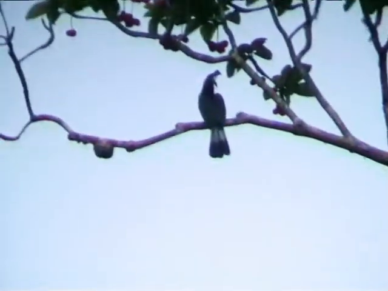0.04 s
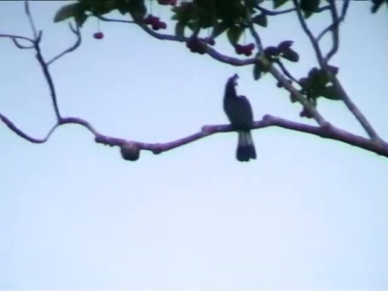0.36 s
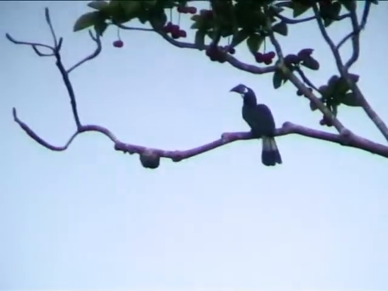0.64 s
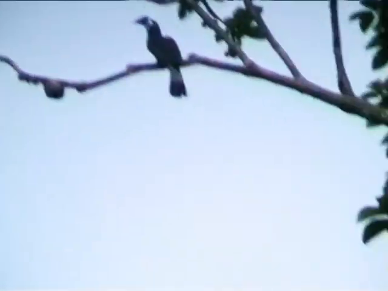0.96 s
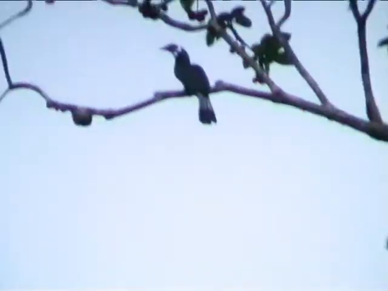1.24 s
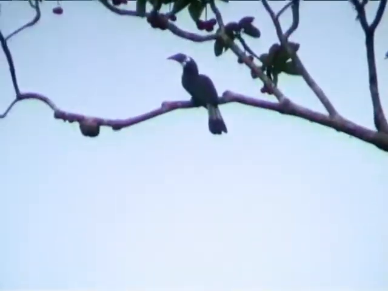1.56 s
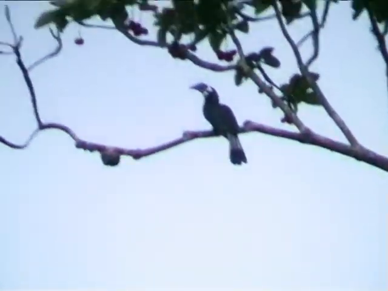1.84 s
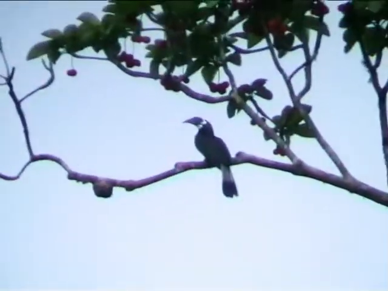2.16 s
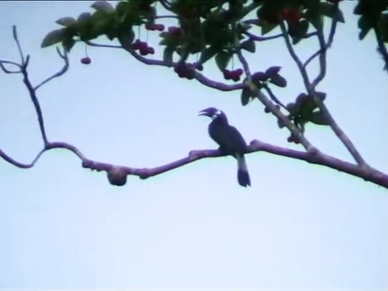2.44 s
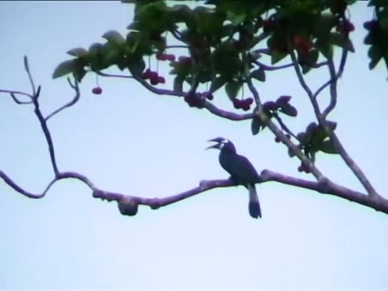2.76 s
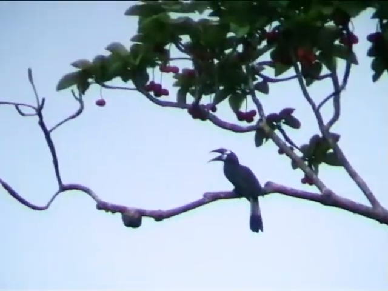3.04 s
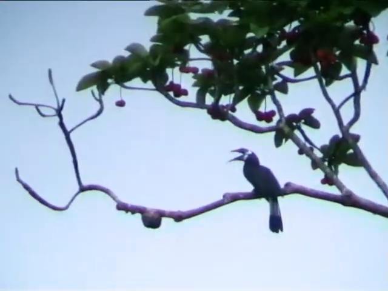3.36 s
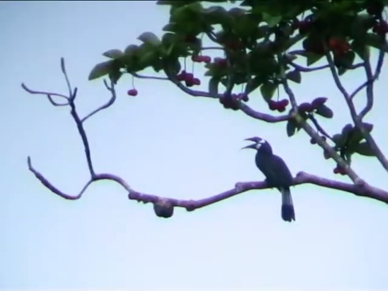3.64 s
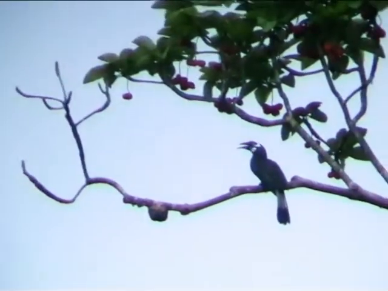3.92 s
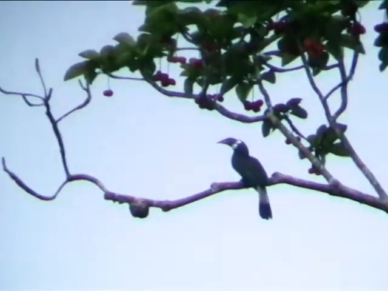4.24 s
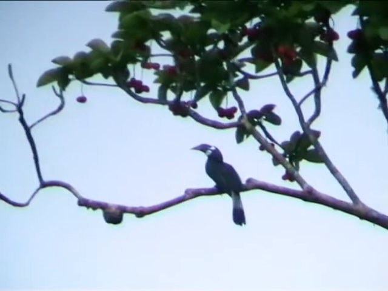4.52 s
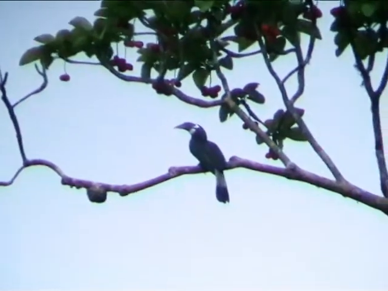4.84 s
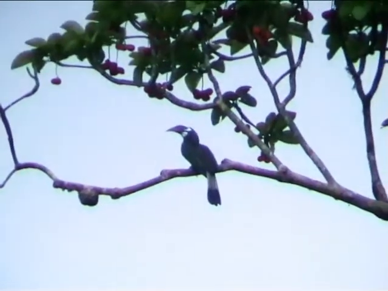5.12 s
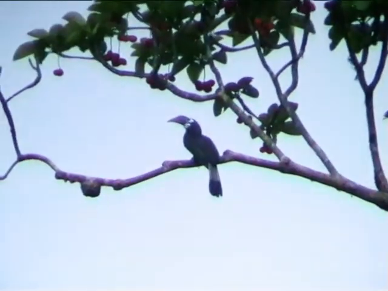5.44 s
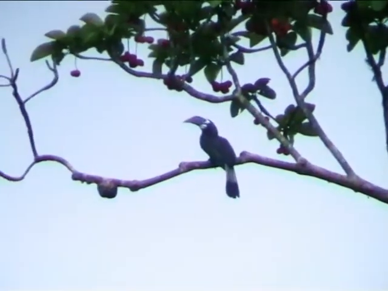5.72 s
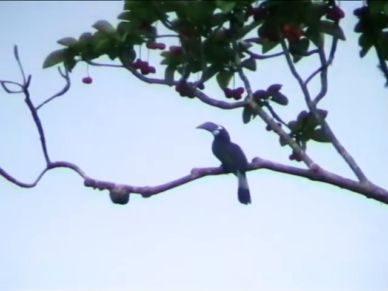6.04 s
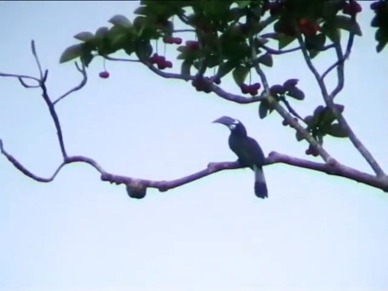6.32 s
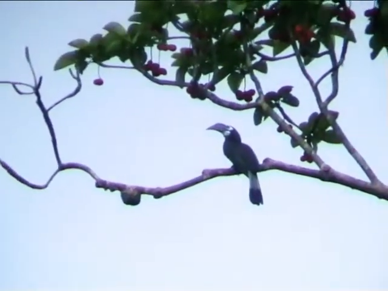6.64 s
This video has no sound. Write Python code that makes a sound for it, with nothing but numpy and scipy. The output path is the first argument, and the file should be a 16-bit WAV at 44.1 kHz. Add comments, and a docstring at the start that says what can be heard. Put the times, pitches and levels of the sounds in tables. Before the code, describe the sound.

In a forest, a hornbill calls from a treetop: a few short notes, then a run of four loud, piping yelps that rise and fall in pitch. Softer reedy yelps and pips follow, then a second run of four. The calls echo lightly among the trees. A small bird chips and trills thinly far off, over a steady rush like distant water, all heard in mono.

```python
"""In a forest, with hornbills calling from a treetop: two loud runs of arched, piping yelps, and softer,
reedy yelps and pips between and across them. Each is a nearly pure tone with a hoarse octave, echoed by
limbs, leaves and trunks. Far off, small birds chip and trill thinly over a steady rush like distant water.
The microphone is a mono camera's, with a row of narrow notches at multiples of its motor hum."""
import sys
import numpy as np
from scipy import signal
from scipy.fft import rfft, irfft
from scipy.io import wavfile
from scipy.ndimage import uniform_filter1d

SR = 44100
rng = np.random.default_rng(int(sys.argv[2]) if len(sys.argv) > 2 else 0)


def log_audio(samples):
    """Write samples as a 16-bit WAV file to the path given in sys.argv[1]."""
    # one column per channel
    frames = np.atleast_2d(samples).T
    # limit to full scale, then quantise
    limited = np.clip(frames, -1, 1)
    pcm = np.round(limited * 32767).astype(np.int16)
    wavfile.write(sys.argv[1], SR, pcm)


N = 298998

# spectrum of the distant rush, lower and upper part: (frequency [Hz], relative level [dB])
RUSH_LOW = [(20, -54), (42, -43), (62, -53), (95, -15.5), (150, -14), (250, -4), (370, 4.5), (520, 4.5),
            (650, 3), (980, 6.5), (1380, 2.5), (1650, 2)]
RUSH_HIGH = [(2000, -0.5), (2400, -3.5), (3100, -5), (3800, -7.5), (5000, -7.5), (6400, -8.5),
             (7500, -14.5), (9000, -22), (11000, -32), (13500, -44), (15700, -46)]
# its slow swell: (time [s], gain [dB])
RUSH_SWELL = [(0, -0.45), (1.5, -0.84), (3, 0.11), (6.8, 0.1)]

# falling chips of a small bird, far off: (middle time [s], level [dB])
CHIPS = [(.552, -24), (.797, -26), (.960, -28), (1.503, -25), (1.684, -23.5), (2.859, -21), (3.033, -22.5)]
CHIP_S, CHIP_HZ, CHIP_FALL_HZ = .045, 6320, 1030
# its buzzy, slightly rising trills: (middle time [s], pitch [Hz], level [dB])
TRILLS = [(.262, 6465, -25), (1.995, 6275, -27.5), (2.310, 6020, -29.5)]
TRILL_S, TRILL_RISE_HZ, TRILL_DEPTH_HZ, TRILL_RATE_HZ = .074, 313, 425, 105
# faint, even whistles from further off still: (middle time [s], pitch [Hz], level [dB])
WHISTLES = [(3.208, 4520, -29), (5.277, 4970, -26)]
WHISTLE_S = .051

# reflections off nearby limbs: (delay [s], gain [ratio])
LIMB_BOUNCES = [(.00318, .55), (.0080, .18)]
# hornbill voice colour, added to the note levels below; weak at the foot of the voice,
# thin where the highest yelps top out: (frequency [Hz], gain [dB])
VOICE_COLOUR = [(1320, -7), (1450, 0), (1600, 0.5), (1700, -3), (1820, 0), (1885, 0.3), (1925, -13.5),
                (1990, -2), (2800, 1.5), (3400, -1.5), (3730, -0.5), (3850, -8.5), (4000, -12)]
# short, pure pips: (time of top [s], top pitch [Hz], level [dB])
PIPS = [(1.033, 1320, -16.5), (3.898, 1680, -20), (4.229, 1645, -21.5), (4.432, 1675, -19),
        (4.610, 1570, -27), (4.797, 1260, -15.5)]
PIP_S, PIP_FALL_HZ, PIP_OCTAVE_DB = .066, 93, -38.5
# soft yelps: (time of top [s], length [s], top pitch [Hz], fall to either end [Hz], level [dB])
SOFT_YELPS = [ (0.053, .085, 1800, 240, -18), (0.23, .07, 1735, 91, -18), (.404, .064, 1715, 50, -8.5),
              (2.896, .07, 1720, 159, -19), (3.070, .085, 1863, 253, -15.5), (3.236, .08, 2000, 459, -9),
              (3.389, .075, 1645, 228, -22), (3.398, .072, 1858, 213, -18), (3.564, .075, 1856, 251, -19.5),
              (3.601, .062, 1580, 120, -28), (3.735, .08, 1847, 250, -27), (4.855, .055, 1676, 110, -20),
              (5.052, .065, 1853, 110, -23.5), ]
SOFT_USUAL_DB, SOFT_OCTAVE_DB, OCTAVE_DB_PER_DB = -19, -26.5, .28
# full yelps: (time of top [s], top pitch [Hz], arch half width [s], level [dB], octave level [dB])
FULL_YELPS = [ (1.260, 1706, 0.031, -13.5, -32), (1.461, 1927, 0.047, -11, -25.5),
              (1.6727, 1944, 0.049, -11.5, -27.5), (1.901, 1903, .0463, -11.5, -25),
              (5.020, 1710, 0.029, -12.5, -29), (5.225, 1890, .0445, -14, -27),
              (5.441, 1870, 0.047, -13.5, -24), (5.674, 1636, 0.034, -17, -30.5), ]
FOOT_HZ, YELP_S = 1364, .138
POINTED_HZ, POINTED_SHAPE, FLATTEN_PER_HZ = 1689, 1.93, .00833

# the camera's notches: (frequency [multiples of the motor hum])
NOTCH_ORDERS = [.5, 1, 2, 3, 4, 6, 7, 8, 9, 10, 11, 12, 13, 14, 16, 18, 20, 22, 24]


def amp(db):
    """Decibels to gain."""
    return 10 ** (np.asarray(db) / 20)


def unit(x):
    """Scales to rms 1."""
    return x / np.sqrt(np.mean(x ** 2) + 1e-20)


def level_at(spectrum, hz):
    """A spectrum's level in dB, interpolated on a log-frequency axis."""
    points_hz, db = np.transpose(spectrum)
    return np.interp(np.log(hz + 1), np.log(points_hz + 1), db)


def delayed(x, s):
    """The sound s seconds later."""
    return np.interp(np.arange(N) - s * SR, np.arange(N), x, left=0)


def waver(rate_hz):
    """Random wavering of rms 1, up to about the given rate."""
    hz = np.fft.rfftfreq(N, 1 / SR)
    return unit(irfft(rfft(rng.standard_normal(N)) * np.exp(-(hz / rate_hz) ** 2), N))


def note(middle, length, edge_s):
    """Sample indices, times from the middle, and the soft-edged envelope of one note."""
    start, end = int((middle - length / 2) * SR), int((middle + length / 2) * SR)
    at = np.arange(max(start, 0), min(end, N))
    t = at / SR - middle
    ramp = np.clip((length / 2 - abs(t)) / edge_s, 0, 1)
    return at, t, np.sin(np.pi / 2 * ramp) ** 2


def distant_rush(level_db=-19, patch_db=.61):
    """The bed of the scene: broad, far-off noise with faint drifting patches and a slow swell."""
    frames, hz = N // 256 + 5, np.fft.rfftfreq(2048, 1 / SR)
    real, imag, patches = rng.standard_normal((3, frames, len(hz)))
    patches = uniform_filter1d(patches, size=16, axis=0)  # smooth in time
    patches = unit(uniform_filter1d(patches, size=24, axis=1))  # and in frequency
    spectra = (real + 1j * imag) * amp(level_at(RUSH_LOW + RUSH_HIGH, hz) + patch_db * patches)
    noise = signal.istft(spectra.T, nperseg=2048, noverlap=1792)[1][:N]
    swell_db = np.interp(np.arange(N) / SR, *np.transpose(RUSH_SWELL))
    return unit(noise) * amp(level_db + swell_db)


def small_birds(scatter_hz=170):
    """Thin chips, trills and whistles far from the microphone; the more a note sweeps, the more ragged."""
    notes = [(s, CHIP_S, CHIP_HZ, -CHIP_FALL_HZ, 0, db) for s, db in CHIPS]
    notes += [(s, TRILL_S, hz, TRILL_RISE_HZ, TRILL_DEPTH_HZ, db) for s, hz, db in TRILLS]
    notes += [(s, WHISTLE_S, hz, 0, 0, db) for s, hz, db in WHISTLES]
    out, tremor = np.zeros(N), waver(450)
    for s, length, middle_hz, sweep_hz, depth_hz, db in notes:
        at, t, envelope = note(s, length, edge_s=.027)
        ragged = min((abs(sweep_hz) + depth_hz) / 900, 1)
        hz = middle_hz + sweep_hz * t / length + depth_hz * np.sin(2 * np.pi * TRILL_RATE_HZ * t)
        hz += ragged * scatter_hz * tremor[at]
        out[at] += amp(db) * envelope * np.sin(2 * np.pi * np.cumsum(hz) / SR)
    return out


def forest_scatter(x, t60_s, build_s, echoes_per_s=2000):
    """Trunks and leaves send back sparse random echoes that build up and die away."""
    t = np.arange(SR) / SR
    echoes = rng.standard_normal(SR) * (rng.random(SR) < echoes_per_s / SR)
    echoes *= (1 - np.exp(-t / build_s)) * np.exp(-np.log(1000) * t / t60_s)
    return signal.fftconvolve(x, echoes / np.linalg.norm(echoes))[:N]


def limb_bounces(x):
    """Reflections reach the microphone just behind the direct sound, so a glide swells and dips."""
    return x + sum(gain * delayed(x, lag_s) for lag_s, gain in LIMB_BOUNCES)


def arch_top(s, length, top_hz, fall_hz, db, octave_db, fade_db=10):
    """Only the top of a pitch arch is voiced; towards the ends the fundamental fades before the octave."""
    at, t, envelope = note(s, length, edge_s=.0096)
    away = (2 * t / length) ** 2
    return at, top_hz - fall_hz * away, envelope * amp(db - fade_db * away), envelope * amp(octave_db)


def soft_yelp(s, length, top_hz, fall_hz, db):
    """A soft yelp is reedy: its octave stays strong when the effort drops."""
    octave_db = SOFT_OCTAVE_DB + OCTAVE_DB_PER_DB * (db - SOFT_USUAL_DB)
    return arch_top(s, length, top_hz, fall_hz, db, octave_db)


def full_yelp(s, top_hz, half_width_s, db, octave_db):
    """The pitch leaps from the foot of the voice and falls back; the higher the leap, the flatter its top."""
    at, t, envelope = note(s, YELP_S, edge_s=.024)
    shape = POINTED_SHAPE + FLATTEN_PER_HZ * max(top_hz - POINTED_HZ, 0)
    hz = FOOT_HZ + (top_hz - FOOT_HZ) * np.exp(-abs(t / half_width_s) ** shape)
    return at, hz, envelope * amp(db), envelope * amp(octave_db)


def hornbills(jitter=.0061, shimmer_db=.75, hoarse_db=3, third_re_octave_db=-17):
    """The subject, up in the treetop: nearly pure, arching tones with a hoarse octave and a slight tremor."""
    notes = [full_yelp(*row) for row in FULL_YELPS] + [soft_yelp(*row) for row in SOFT_YELPS]
    notes += [arch_top(s, PIP_S, hz, PIP_FALL_HZ, db, PIP_OCTAVE_DB) for s, hz, db in PIPS]
    out = np.zeros(N)
    tremor, flutter, rasp = waver(240), waver(210), waver(140)
    for at, hz, fundamental_gain, octave_gain in notes:
        phase = 2 * np.pi * np.cumsum(hz * (1 + jitter * tremor[at])) / SR
        fundamental = fundamental_gain * amp(level_at(VOICE_COLOUR, hz)) * np.sin(phase)
        overtones = np.sin(2 * phase) + amp(third_re_octave_db) * np.sin(3 * phase)
        overtones *= octave_gain * amp(level_at(VOICE_COLOUR, 2 * hz) + hoarse_db * rasp[at])
        out[at] += amp(shimmer_db * flutter[at]) * (fundamental + overtones)
    return out


def scene():
    """At the microphone: the birds and their echoes over the rush, the same in both channels."""
    calls, chips = limb_bounces(hornbills()), small_birds()
    far_echo = amp(-18) * delayed(calls, .124)  # from the next stand of trees
    leaves = amp(-13) * forest_scatter(calls, t60_s=.14, build_s=.004)  # the crown around the bird
    forest_tail = amp(-13) * forest_scatter(calls, t60_s=1.8, build_s=.04)
    chip_echoes = amp(-3.5) * forest_scatter(chips, t60_s=.2, build_s=.002)
    background = distant_rush() + chips + chip_echoes
    return np.tile(background + forest_tail + far_echo + leaves + calls, (2, 1))


def record(dry, hum_hz=300, notch_share=.52, max_width_hz=42, band_limit_hz=15720):
    """The camera takes a share out of narrow bands at multiples of its motor hum, then cuts the top end."""
    out = dry
    for order in NOTCH_ORDERS:
        hz = order * hum_hz
        width_hz = min(max_width_hz, hz / 9)
        band = signal.lfilter(*signal.iirpeak(hz, hz / width_hz, fs=SR), out)
        out = out - notch_share * band
    low_pass = signal.firwin(1023, band_limit_hz, window=("kaiser", 10), fs=SR)
    return signal.oaconvolve(out, low_pass[None], "same")


dry = scene()
out = record(dry)
log_audio(out)
```